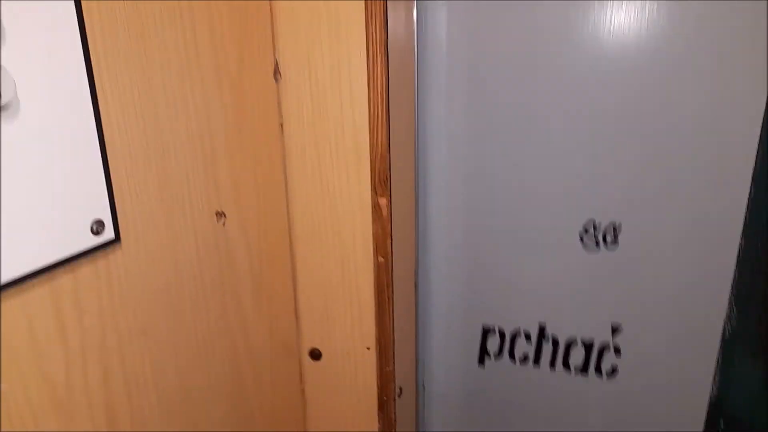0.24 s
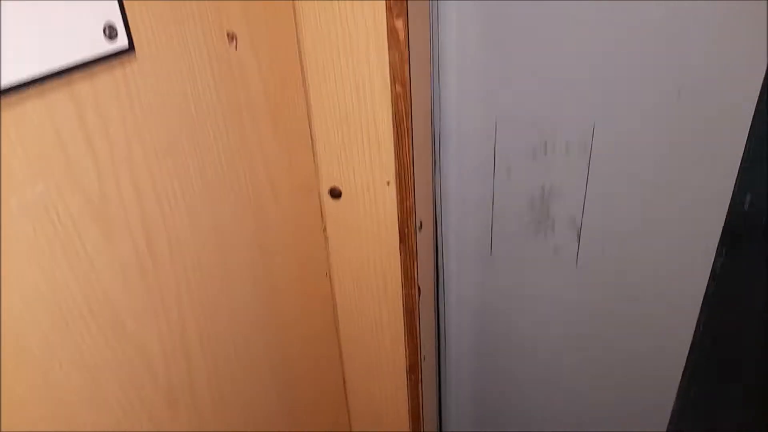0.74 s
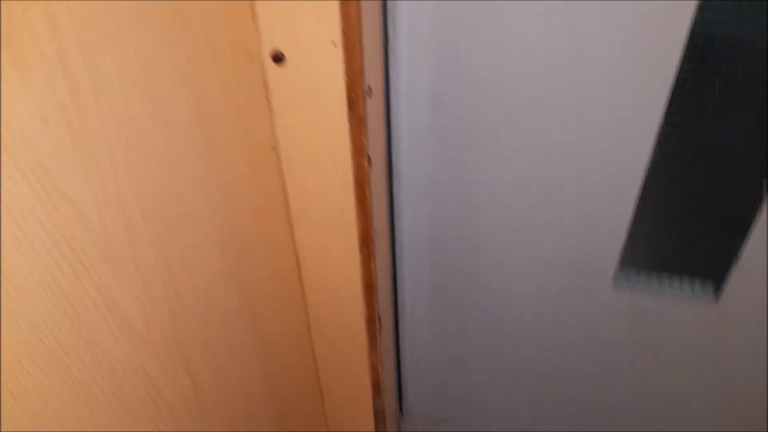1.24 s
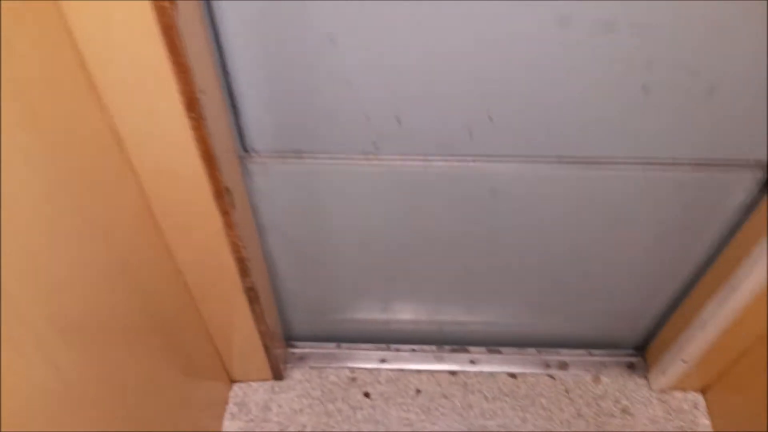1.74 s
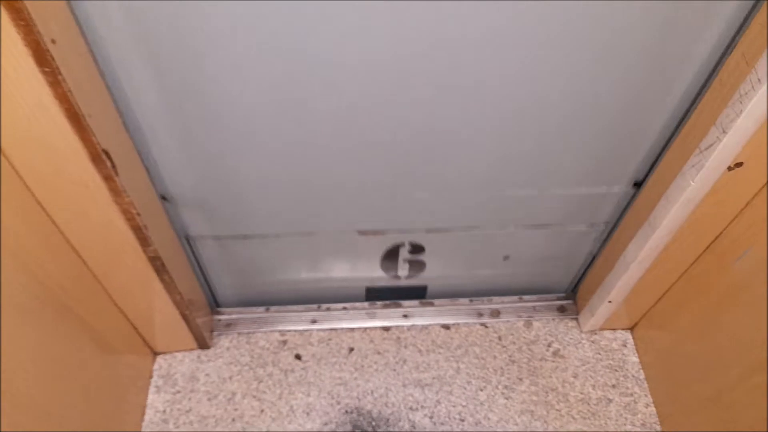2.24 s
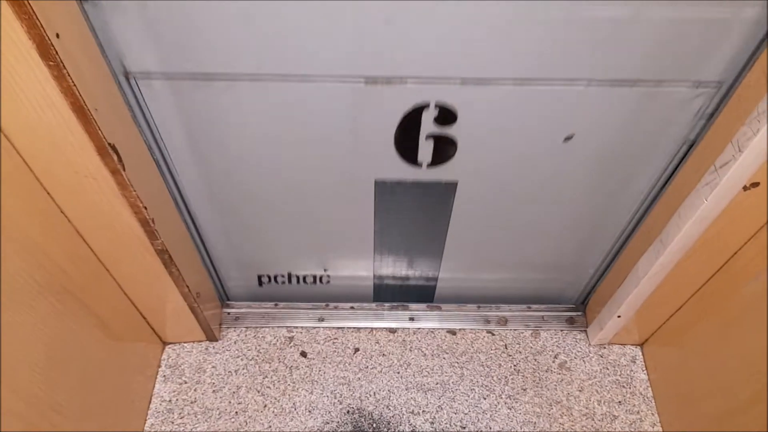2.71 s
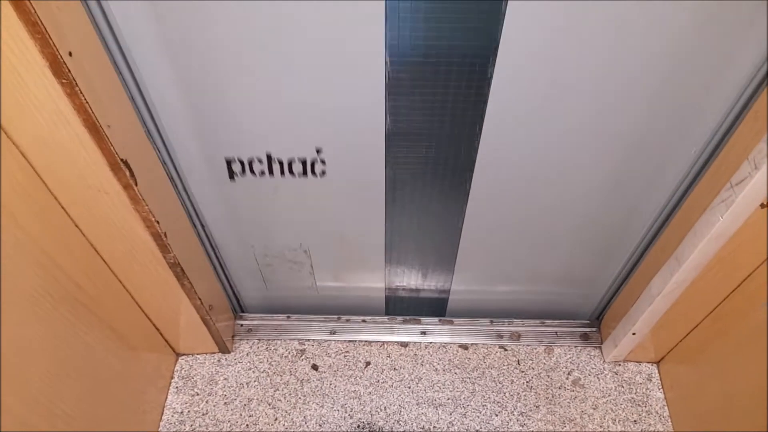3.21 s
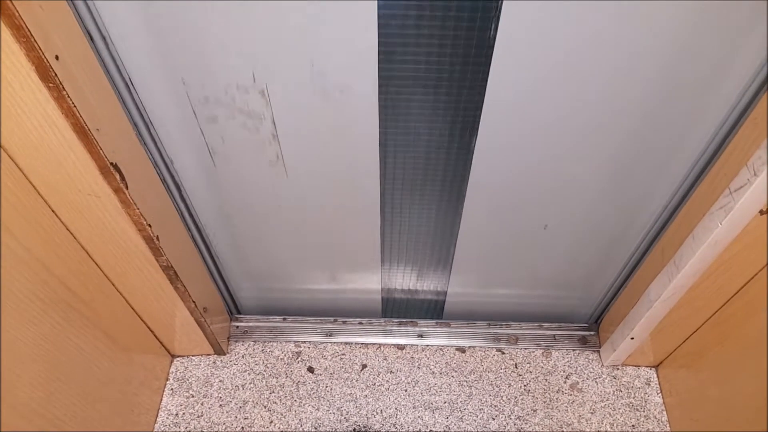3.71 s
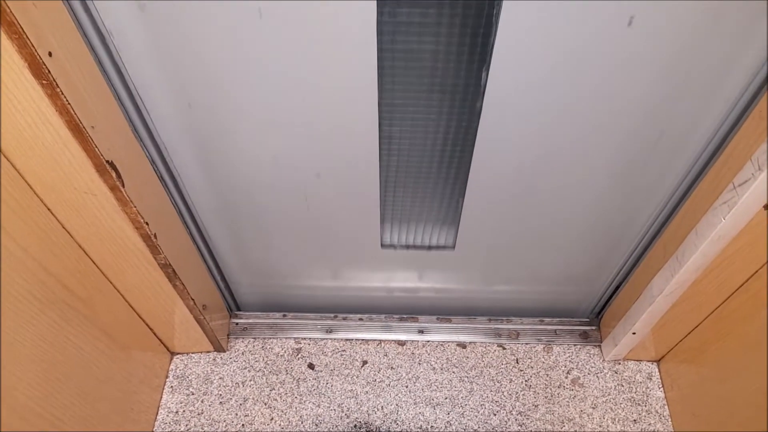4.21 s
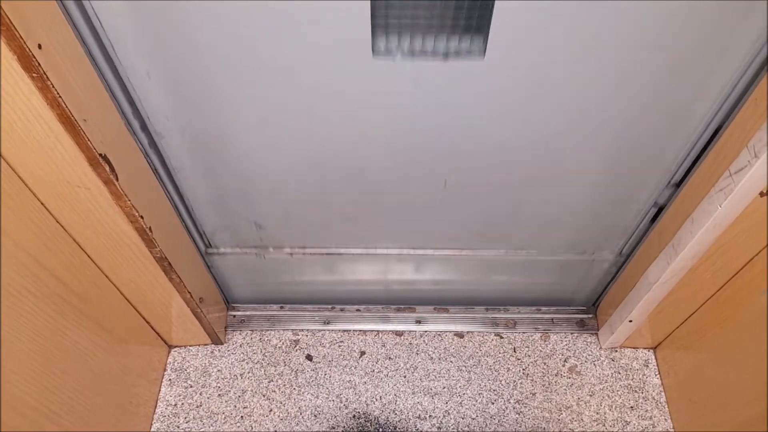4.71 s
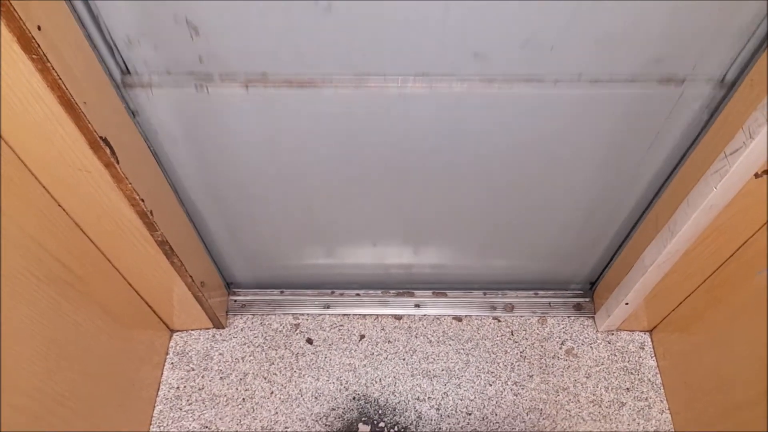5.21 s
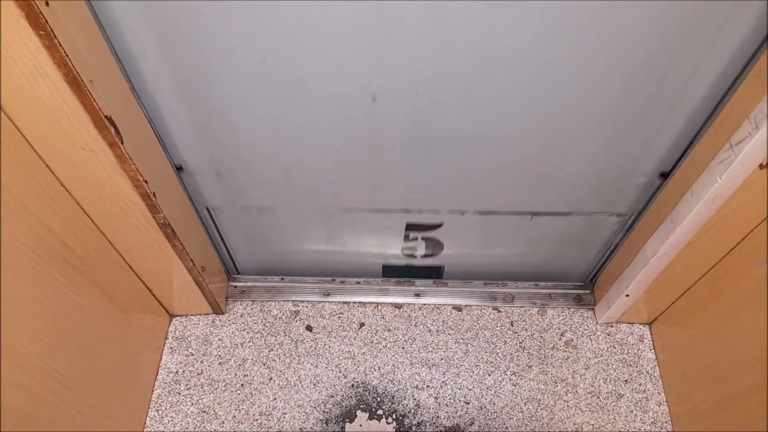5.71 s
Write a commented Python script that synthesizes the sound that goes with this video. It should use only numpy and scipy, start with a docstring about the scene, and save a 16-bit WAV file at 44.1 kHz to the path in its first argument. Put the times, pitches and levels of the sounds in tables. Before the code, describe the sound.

An old lift starts moving, heard close up in stereo from within the cramped cabin. A metallic bang decays in the shaft, a starting switch clacks loudly in a fluttering burst, and the winch glides upward in pitch before holding a low, beating drone. Gear chatter and knocks are strongest near two seconds, then ease. Travel continues with rumble, soft sliding, brief squeaks and ticks; landing switches clack again near four seconds and most strongly just after five.

```python
"""Old wooden lift setting off

Inside the car, a bang dies away in the shaft, a switch clacks and the winch takes up speed, then travels on.
The winch is a stack of sines locked to the motor turn: its third and fourth orders beat once per turn.
Shaped noise makes the car's rumble and panels, the chattering gear, the guide shoes, scrapes, ticks and hiss.
Squeaks are rough sines; switch clacks are clicks fluttering between cabin walls over ringing metal and echo.
The cabin's standing waves lift the winch overtones, the rumble, the panels and the echo of the thuds."""
import sys
import numpy as np
from scipy import signal
from scipy.fft import rfft, irfft, next_fast_len
from scipy.io import wavfile
from scipy.ndimage import map_coordinates

SR = 44100
rng = np.random.default_rng(int(sys.argv[2]) if len(sys.argv) > 2 else 0)


def store_pcm(level_fs):
    """Save levels as 16-bit WAV."""
    pcm = np.round(np.clip(level_fs, -1, 1) * 32767).astype(np.int16)
    wavfile.write(sys.argv[1], SR, np.atleast_2d(pcm).T)


N = 262395

# Motor shaft. Each row: time in seconds, speed in turns per second.
MOTOR_SPEED = [(0.3, 11.315), (0.5, 13.533), (0.64, 15.504), (0.9, 15.6), (1.25, 16.03), (1.6, 16.207),
               (2.2, 16.251), (3.0, 16.167), (4.2, 16.163), (5.95, 16.143)]
# Load on the winch, heard as its third order. Each row: time in seconds, level in dB.
WINCH_LOAD = [(0.2, -69), (0.42, -43.5), (2.03, -26.5), (2.89, -30.5), (3.28, -42), (5.15, -45.5),
              (5.72, -36.5), (5.88, -34.5)]
# The winch's drone, its fourth order. Each row: time in seconds, level in dB.
WINCH_DRONE = [(0.06, -41.5), (0.25, -50.5), (0.68, -28.5), (0.84, -44), (0.92, -27.5), (1.07, -21.5),
               (1.72, -30), (2.27, -26.5), (3.85, -27), (4.12, -31.5), (4.68, -30.5), (5.18, -36),
               (5.23, -28.5), (5.51, -32), (5.9, -25)]
# Winch overtones before the cabin lifts them. Each row: multiple of the shaft speed, relative level in dB.
WINCH_ORDERS = [(2, -45), (5, -47), (6, -46), (7, -52), (8, -52.5), (9, -65.5), (10, -61), (11, -59.5),
                (13, -61.5), (20, -59), (25, -56.5), (26, -57.5), (31, -71), (38, -74)]

# Noise colours: only their shape counts. Each row: frequency in Hz, relative level in dB.
# The cabin's standing waves are added to the rumble and the panels.
RUMBLE_COLOUR = [(18, -9.5), (35, 9), (85, 10.5), (120, -8), (145, -1.5), (175, -1), (195, -3), (260, -7.5),
                 (330, -23.5)]
PANEL_COLOUR = [(180, -18.5), (280, -1.5), (410, 0), (470, -4.5), (800, -7.5), (950, -13), (1500, -15.5),
                (2500, -26)]
SHOE_COLOUR = [(700, -7.5), (1200, -22.5), (1700, -7.5), (2000, 5.5), (2600, 0), (3400, -9), (4800, -15.5),
               (6200, -16), (7400, -33), (10000, -47)]
HISS_COLOUR = [(3000, -3), (7000, 0), (9000, -7), (11500, -1), (14000, 0.5), (15700, -2)]
SNAP_COLOUR = [(800, -4.5), (1900, 3), (3000, 1), (3500, -8), (4500, -11), (6500, -19), (8000, -39),
               (14000, -35.5)]
TICK_COLOUR = [(1200, -16), (3500, 8), (6200, -0.5), (8000, -9.5), (13000, -4.5), (16000, -10)]
BANG_COLOUR = [(40, -6), (90, 9.5), (180, -15.5), (300, -2.5), (760, -4), (900, -3.5), (1020, -14.5),
               (1650, -13.5), (2000, -9.5), (3100, -13.5), (3400, -18.5), (8000, -39.5)]
# Gear teeth, with the same columns.
GEAR_COLOUR = [(250, -11.0), (400, 3.5), (930, -5.0), (1100, 3.0), (1550, 4.0), (2300, -8.0), (3500, -28.5)]
# Thud of a switch, with the same columns; each switch tilts it before use.
THUD_COLOUR = [(90, -13), (260, 3), (420, 1.5), (800, -0.5), (1050, -6), (1650, -4), (2100, -10.5),
               (3000, -26), (8000, -71)]

# Resonances of the door's steel ramp. Each row: frequency in Hz, width in Hz, relative level in dB.
RAMP_MODES = [(2130, 90, -6), (2520, 160, -6), (2790, 120, -9)]
# Steel panel ringing in the shaft. Each row: frequency in Hz, level in dB relative to STEEL_DB.
STEEL_MODES = [(301, -4), (710, -5), (838, -5), (851, 4.5), (893, 1), (925, -4), (1360, -14), (2138, -10),
               (2805, -13)]
# Ring of the starting switch's lever. Each row: frequency in Hz, relative level in dB, 60 dB decay in seconds.
LEVER_MODES = [(280, 2, .3), (630, -9, .26), (899, -5, .19), (1340, -3, .22), (1637, -1, .17),
               (1701, -2, .17), (2476, -7, .22), (2620, -6, .15)]
# Ring of a landing switch's arm, with the same columns.
ARM_MODES = [(334, -3, .3), (404, -1, .3), (517, 1, .28), (754, 3, .3), (880, 0, .25), (1373, -5, .17),
             (1595, 0, .11), (1879, -6, .16)]

# Clacks of the starting switch. Each row: start in seconds, thud level in dB, snap level in dB.
START_CLACKS = [(.396, -54, -52.5), (.586, -28.5, -40.5), (.802, -44, -56), (0.899, -44, -55.5),
                (.968, -40, -56)]
# Clacks of the landing switches, with the same columns.
LANDING_CLACKS = [(1.346, -34.5, -54), (1.353, -36.5, -56), (3.956, -38.5, -59), (4.264, -34, -50.5),
                  (4.302, -45, -53), (5.131, -29, -42.5)]
# Metal scrapes before grain and pan. Each row: start in seconds, level in dB, rise in seconds,
# 60 dB decay in seconds.
METAL_SCRAPES = [(1.38, -47.5, 0.023, 0.41), (2.46, -44.5, 0.011, 0.29), (4.22, -47.5, 0.026, 0.16),
                 (4.325, -46, .025, 0.49), (4.82, -48.5, 0.06, 0.22), (5.19, -41.5, 0.01, 0.9),
                 (5.27, -38.5, 0.03, 0.21)]
# Buzzes of the door's ramp as the switch arm rides onto it, with the same columns.
RAMP_BUZZES = [(5.139, -41, .006, 0.47), (5.28, -50, 0.022, 0.2)]
# Light crisp ticks and scuffs, with the same columns.
CRISP_TICKS = [(1.633, -53, 0.0031, 0.37), (1.722, -55, 0.0049, 0.68), (1.79, -50, 0.036, 0.22),
               (2.031, -50, 0.0042, 0.29), (5.131, -57.5, 0.00077, 0.55)]
# Shoe squeaks before pan. Each row: centre in seconds, pitch in Hz, level in dB, half length in seconds.
SHOE_SQUEAKS = [(1.33, 2880, -52, 0.014), (1.39, 2875, -53, .018), (1.5, 3060, -60, .02),
                (3.151, 2326, -47.5, 0.006), (3.265, 3230, -56.5, .05), (4.824, 2950, -57, 0.028),
                (4.877, 2074, -49, 0.022)]
# Places where the gear chatters. Each row: share of a turn, relative level in dB.
GEAR_TEETH = [(0, 4.5), (.3, -4), (0.559, -3)]
# Heavier knocks of the gear. Each row: start in seconds, level in dB.
KNOCKS = [(1.984, -46.5), (2.051, -44), (2.233, -39.5), (2.262, -42.5)]

# Stereo width of noise. Each row: frequency in Hz, left-right likeness from 0 to 1.
LIKENESS = [(60, 0.98), (290, 0.76), (640, 0.7), (1400, 0), (15000, 0.28)]
# Decay of the cabin's dense echo. Each row: frequency in Hz, 60 dB decay in seconds.
CABIN_DECAY = [(800, 0.59), (2500, 0.47), (12000, 0.053)]
# Decay of the shaft, with the same columns.
SHAFT_DECAY = [(500, 1.1), (2500, 1.01), (7000, 0.59)]
# Lean of the bang's echo to the right. Each row: frequency in Hz, channel difference in dB.
ECHO_LEAN = [(800, 1), (2300, 8.0), (8000, 1)]
# Standing waves of the cabin. Each row: frequency in Hz, lift in dB.
CABIN_MODES = [(141, 12), (162, 6), (174, 7), (211, 5), (300, 6), (373, 5), (425, 4), (501, 6), (615, 3)]

STANDING_WIDTH_HZ, TOP_HZ = 5, 15720
# Load in dB that counts as full; the levels marked "at full load" refer to it.
FULL_LOAD_DB = -23.5
# Level at full load in dB, then dB gained per dB of load; the mesh tone lags the load (s).
OVERTONE_DB, OVERTONE_GROWS = 2, 0.33
MESH_DB, MESH_GROWS, MESH_LAG_S = -56.5, 1.0, 0.63
CHATTER_DB, CHATTER_GROWS = -48.5, 0.95
# The overtones are fully up by this time (s) and weaken no further below this relative load (dB).
WINCH_UP_S, LIGHT_LOAD_DB = 0.86, -20
# Extra overtone level while the motor strains (dB), faded out by the time it is at speed (s).
STRAIN_DB, AT_SPEED_S = 4.5, 1.9
# The car gathers way between these times (s); the full rise from rest is REST_DB.
START_S, UNDER_WAY_S, REST_DB = 0.54, 0.98, -8.5
# Steady travel (dB); the panels rattle harder as the load grows (dB per dB).
RUMBLE_DB, PANEL_DB, PANEL_GROWS = -40.5, -42, 0.22
# Guide shoes: steady level (dB), share of the rise from rest, time they are bedded on the rail (s).
SLIDE_DB, SLIDE_GROWS, SHOES_BEDDED_S = -52.5, 0.81, 1.23
# Jolt after each clack: rumble relative to the thud (dB), time to its peak (s).
JOLT_DB, JOLT_RISE_S = -7.5, 0.3
# A clack's first crack (dB), round trip between the walls (s), scatter (share of a trip), loss per trip (dB).
BLOW_DB, FLUTTER_S, FLUTTER_SCATTER, FLUTTER_LOSS_DB = -1.5, .0054, .12, 1.2
# Splintering of each pass (60 dB decay, s); the dense echo behind it (dB, build-up s).
SPLINTER_T60, ECHO_DB, ECHO_RISE_S = .006, -4, .002
# Mains hum of the motor in steady travel, before pan; reference level of the steel panel's ring.
MAINS_HZ, MAINS_DB, STEEL_DB = 300, -59, -43.5
# 60 dB decays of a tooth's tick and a heavier knock (s); a moment when the worn tooth is in mesh (s).
TOOTH_T60, KNOCK_T60, IN_MESH_S = .04, .06, 2.259


def amp(db):
    """Decibels to gain."""
    return 10 ** (np.asarray(db) / 20)


def unit(x):
    """Scaled to rms 1."""
    return x / np.sqrt(np.mean(x ** 2) + 1e-20)


def along(points, hz):
    """Read a (Hz, value) curve on a log frequency axis."""
    f, v = np.transpose(points)
    return np.interp(np.log(hz + 1), np.log(f + 1), v)


def clock():
    """The time of every sample in seconds."""
    return np.arange(N) / SR


def curves(rows):
    """One value per sample for each column after the time."""
    s, *cols = np.transpose(rows)
    return [np.interp(clock(), s, c) for c in cols]


def wobble(rate):
    """A smooth random curve with rate knots a second."""
    coarse = clock()[::64]
    knots = rng.standard_normal(int(N * rate / SR) + 4)
    return np.interp(clock(), coarse, map_coordinates(knots, [coarse * rate]))


def filtered(x, response):
    """Multiply the spectrum of x by a response of frequency."""
    m = next_fast_len(x.shape[-1] + 8192)
    return irfft(rfft(x, m) * response(np.fft.rfftfreq(m, 1 / SR)), m)[..., :x.shape[-1]]


def pan(left_db):
    """Gains of the two channels, the left louder than the right by left_db."""
    return amp(np.array([[left_db], [-left_db]]) / 2)


def noise(colour, size=N):
    """Coloured stereo noise of rms 1, whose left-right likeness depends on frequency."""
    def mid_side(hz):
        turn = np.arccos(np.clip(along(LIKENESS, hz), -1, 1)) / 2
        return colour(hz) * np.array([np.cos(turn), np.sin(turn)])

    mid, side = filtered(rng.standard_normal((2, size)), mid_side)
    return unit(np.array([mid + side, mid - side]))


def shape(points):
    """The gain of frequency of a dB spectrum, falling steeply past its last point."""
    return lambda hz: amp(along(points, hz)) / np.maximum(hz / points[-1][0], 1) ** 6


def cabin_lift(hz):
    """Gain of the cabin's standing waves, narrow resonances on top of a flat response."""
    peaks = [amp(db) ** 2 / (1 + (2 * (hz - centre) / STANDING_WIDTH_HZ) ** 2) for centre, db in CABIN_MODES]
    return np.sqrt(1 + sum(peaks))


def in_cabin(points):
    """A spectrum with the cabin's standing waves lifted out of it."""
    return lambda hz: shape(points)(hz) * cabin_lift(hz)


def dying(x, decays):
    """Fade each frequency of x at its own speed."""
    hz, t, z = signal.stft(x, SR, nperseg=256)
    t60 = np.maximum(along(decays, hz), .01)[:, None]
    return signal.istft(z * amp(-60 * t / t60), SR, nperseg=256)[1][:, :x.shape[-1]]


def add(track, s, sound):
    """Mix a sound into the track at s seconds."""
    part = track[:, max(round(s * SR), 0):][:, :sound.shape[-1]]
    part += sound[:, :part.shape[-1]]


def strokes(rows, colour):
    """Short rubs of noise that swell and fade, one for each row."""
    out, t = np.zeros((2, N)), np.arange(SR // 2) / SR
    for s, db, rise, t60 in rows:
        swell = np.minimum(t / rise, 1) * amp(-60 * np.maximum(t - rise, 0) / t60)
        add(out, s, amp(db) * swell * noise(colour, size=len(t)))
    return out


def load_db(lag_s=0):
    """The winch's load in dB relative to full load."""
    return np.interp(clock() - lag_s, *np.transpose(WINCH_LOAD)) - FULL_LOAD_DB


def travel_db(full_s):
    """Rise of a noise as the car gathers way, holding at 0 dB from full_s on."""
    return np.interp(clock(), [START_S, full_s], [REST_DB, 0])


def shaft_turns():
    """Turns of the motor, the integral of its speed, whole whenever the worn tooth is in mesh."""
    turns = np.cumsum(curves(MOTOR_SPEED)[0]) / SR
    return turns - np.interp(IN_MESH_S, clock(), turns)


def high_hiss():
    """A faint high hiss that rises a little with the travel and wavers slowly."""
    level_db = -70.5 + .3 * travel_db(UNDER_WAY_S) + .5 * wobble(2.3)
    return amp(level_db) * noise(shape(HISS_COLOUR))


def shaft_echo(echo_db=-32.5):
    """A bang dies away in the shaft, with a steel panel's modes ringing on through it."""
    out, t = np.zeros((2, N)), np.arange(SR) / SR
    echo = amp(echo_db) * dying(noise(shape(BANG_COLOUR), size=SR), SHAFT_DECAY)
    add(out, 0, filtered(echo, lambda hz: amp(np.array([-1, 1])[:, None] * along(ECHO_LEAN, hz) / 2)))
    for hz, db in STEEL_MODES:
        phase = rng.uniform(0, 2 * np.pi) + rng.uniform(0, np.pi / 2, (2, 1))
        level = amp(STEEL_DB + db - 60 * t / along(SHAFT_DECAY, hz))
        add(out, 0, level * np.sin(2 * np.pi * hz * t + phase))
    return out


def jolts():
    """Shaking of the car that builds after each clack and slowly settles."""
    total = 0
    for s, thud_db, _ in START_CLACKS + LANDING_CLACKS:
        age = np.maximum(clock() - s, 0) / JOLT_RISE_S
        total = total + (amp(thud_db + JOLT_DB) * age * np.exp(1 - age)) ** 2
    return np.sqrt(total)


def car():
    """The car body rumbles, harder after each jolt, and its wooden panels rattle with the load."""
    shaking = np.hypot(amp(RUMBLE_DB + 0.92 * travel_db(UNDER_WAY_S)), jolts())
    rumble = shaking * amp(0.61 * wobble(6.1)) * noise(in_cabin(RUMBLE_COLOUR))
    panel_db = PANEL_DB + PANEL_GROWS * load_db() + 0.87 * travel_db(UNDER_WAY_S)
    panels = amp(panel_db + 1.56 * wobble(30)) * noise(in_cabin(PANEL_COLOUR))
    return rumble * pan(-1.2) + panels * pan(-0.4)


def ticks():
    """Small bright ticks and scuffs close by, short strokes of crisp noise."""
    return strokes(CRISP_TICKS, shape(TICK_COLOUR))


def ramp_response(hz):
    """Summed resonances of the door's steel ramp, cut off above 3300 Hz."""
    modes = [amp(db) * 1j * hz * width / (f0 ** 2 - hz ** 2 + 1j * hz * width) for f0, width, db in RAMP_MODES]
    return abs(sum(modes)) * (hz < 3300)


def scrapes(grain_db=-0.5):
    """Metal rubs past metal at the right of the car, in uneven grains, and the door's ramp buzzes."""
    rubs = strokes(METAL_SCRAPES, shape(SNAP_COLOUR)) + strokes(RAMP_BUZZES, ramp_response)
    return rubs * amp(grain_db * wobble(120)) * pan(-5.5)


def shoes(grain_db=1.27):
    """Guide shoes slide on the rail at the right and now and then catch into a short, rough squeak."""
    t = clock()
    slide_db = SLIDE_DB + SLIDE_GROWS * travel_db(SHOES_BEDDED_S)
    slide = amp(slide_db + 0.38 * wobble(13.0) + grain_db * wobble(45)) * noise(shape(SHOE_COLOUR))
    for s, hz, db, half in SHOE_SQUEAKS:
        swell = amp(db + 2 * wobble(60)) * np.exp(-.5 * ((t - s) / half) ** 2)
        # random phase slips in radians, separate for each ear, roughen the tone
        slips = np.array([wobble(150) for ear in range(2)])
        slide += swell * np.sqrt(2) * np.sin(2 * np.pi * hz * t + slips)
    return slide * pan(-7.5)


def gear():
    """Worn teeth chatter at the same few places in every turn and now and then knock, dulled by the shaft."""
    turns, speed, t = shaft_turns(), curves(MOTOR_SPEED)[0], clock()
    bursts = 0
    for place, db in GEAR_TEETH:
        since_tooth = ((turns - place) % 1) / speed
        bursts = bursts + amp(db + 2.2 * wobble(17) - 60 * since_tooth / TOOTH_T60)
    chatter = amp(CHATTER_DB + CHATTER_GROWS * load_db()) * unit(bursts)
    knocks = sum((t >= s) * amp(db - 60 * abs(t - s) / KNOCK_T60) for s, db in KNOCKS)
    return (chatter + knocks) * noise(shape(GEAR_COLOUR))


def crack(points, size=1024):
    """One sharp causal click of energy 1: the minimum-phase pulse of a dB spectrum."""
    cepstrum = irfft(np.log(amp(along(points, np.fft.rfftfreq(size, 1 / SR)))))
    click = irfft(np.exp(rfft(2 * cepstrum[:size // 2], size)))
    return click / np.linalg.norm(click)


def flutter(click, count=10, size=128):
    """A click bounces between the close cabin walls, weaker on each pass and splintered by the panels."""
    out, t = np.zeros((2, SR // 2)), np.arange(size) / SR
    for k in range(count):
        # the first pass is not scattered in time
        delay = FLUTTER_S * (k + min(k, 1) * rng.normal(0, FLUTTER_SCATTER))
        splinters = rng.standard_normal((2, size)) * amp(-60 * t / SPLINTER_T60)
        splinters /= np.linalg.norm(splinters, axis=1, keepdims=True)
        add(out, delay, amp(-k * FLUTTER_LOSS_DB) * signal.fftconvolve(splinters, click[None], axes=1))
    return out * np.sqrt(FLUTTER_S * SR)


def metal_ring(modes, t):
    """Struck metal: decaying sines with a slightly random level and a phase offset between the ears."""
    ring = 0
    for hz, db, t60 in modes:
        level = amp(db + rng.normal(0, 1) - 60 * t / t60)
        phase = rng.uniform(0, 2 * np.pi) + rng.uniform(0, np.pi / 2, (2, 1))
        ring = ring + level * np.sin(2 * np.pi * hz * t + phase)
    return ring


def switch(clacks, modes, ring_db, tilt_db_per_octave):
    """A crack flutters round the cabin; the switch's metal rings on and a dense echo builds behind."""
    out, t = np.zeros((2, N)), np.arange(SR // 2) / SR
    build, side = 1 - np.exp(-t / ECHO_RISE_S), pan(-7.5)
    body = [(hz, db + tilt_db_per_octave * np.log2(hz)) for hz, db in THUD_COLOUR]
    for s, thud_db, snap_db in clacks:
        thud, snap = amp(thud_db), amp(snap_db) * side
        ring = amp(thud_db + ring_db) * metal_ring(modes, t)
        blow = thud * flutter(crack(body)) + snap * flutter(crack(SNAP_COLOUR))
        echo = thud * noise(in_cabin(body), size=len(t)) + snap * noise(shape(SNAP_COLOUR), size=len(t))
        tail = ring + amp(ECHO_DB) * dying(echo, CABIN_DECAY)
        add(out, s, amp(BLOW_DB) * blow + tail * build)
    return out


def switches():
    """The hard, bright starting switch and the duller landing switches, each with its own metal ring."""
    starting = switch(START_CLACKS, LEVER_MODES, ring_db=-9, tilt_db_per_octave=1.3)
    landing = switch(LANDING_CLACKS, ARM_MODES, ring_db=-9.5, tilt_db_per_octave=0)
    return starting + landing


def winch(mesh_order=23):
    """Shaft orders come down the ropes; overtones flare as they glide through the cabin's standing waves."""
    angle, coarse = 2 * np.pi * shaft_turns(), clock()[::64]
    speed = curves(MOTOR_SPEED)[0][::64]

    def line(order):
        """One order of the shaft, wavering in level and phase, lifted by the cabin."""
        lift = np.interp(clock(), coarse, cabin_lift(order * speed) ** 2)
        phase = rng.uniform(0, 2 * np.pi) + .15 * wobble(4)
        return lift * amp(wobble(2.5)) * np.sin(order * angle + phase)

    # neighbouring orders beat once per motor turn
    third = amp(curves(WINCH_LOAD)[0]) * np.cos(3 * angle)
    fourth = amp(curves(WINCH_DRONE)[0]) * np.cos(4 * angle)
    boom = third + fourth
    strain_db = np.interp(clock(), [UNDER_WAY_S, AT_SPEED_S], [STRAIN_DB, 0])
    pull_db = OVERTONE_GROWS * np.maximum(load_db(), LIGHT_LOAD_DB)
    overtone_db = OVERTONE_DB + pull_db + travel_db(WINCH_UP_S) + strain_db
    overtones = amp(overtone_db) * sum(amp(db) * line(order) for order, db in WINCH_ORDERS)
    mesh = amp(MESH_DB + MESH_GROWS * load_db(MESH_LAG_S)) * line(mesh_order)
    mains = amp(MAINS_DB + travel_db(WINCH_UP_S)) * np.sin(2 * np.pi * MAINS_HZ * clock())
    # a sine of rms 1 peaks at the root of two
    return np.sqrt(2) * (boom * pan(-3.5) + (overtones + mesh + mains) * pan(-0.82))


def scene():
    """Everything heard in the car, from the faint hiss to the winch."""
    background = high_hiss() + shaft_echo() + car()
    details = ticks() + scrapes() + shoes()
    return background + details + gear() + switches() + winch()


def record(dry):
    """Fade both ends softly over 8 ms and keep nothing above the band limit."""
    edges = np.minimum(np.minimum(clock(), clock()[::-1]) / .008, 1)
    return filtered(dry * np.sin(edges * np.pi / 2) ** 2, lambda hz: hz < TOP_HZ)


dry = scene()
out = record(dry)
store_pcm(out)
```